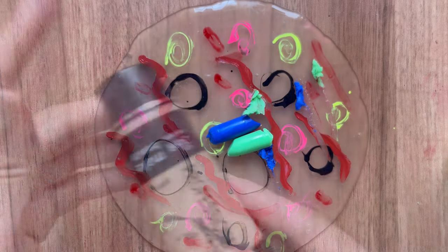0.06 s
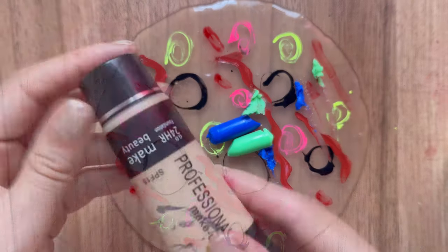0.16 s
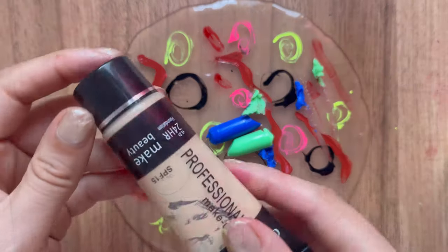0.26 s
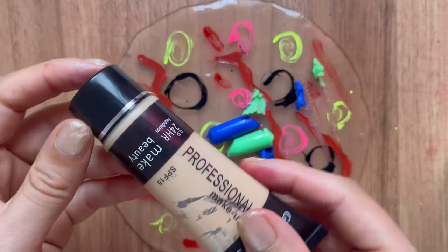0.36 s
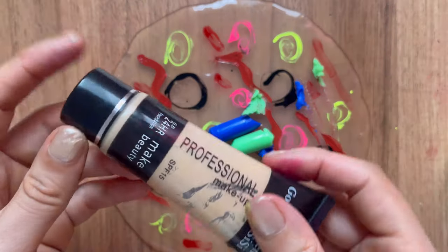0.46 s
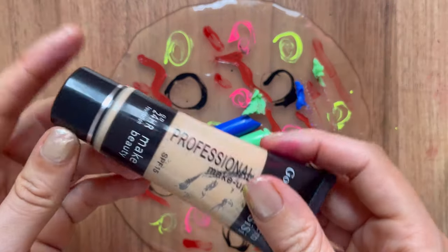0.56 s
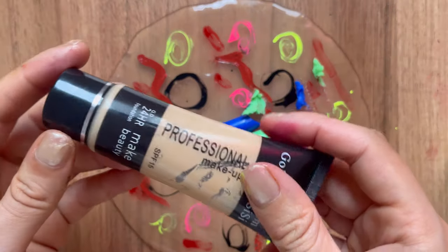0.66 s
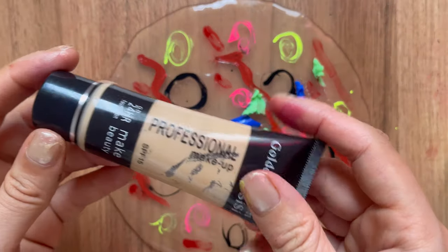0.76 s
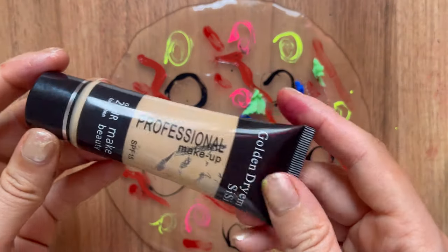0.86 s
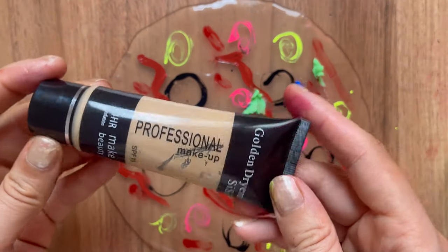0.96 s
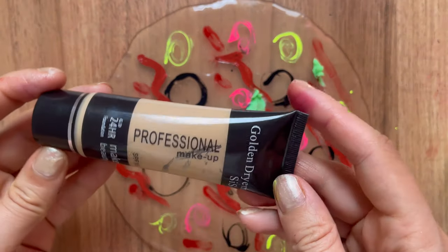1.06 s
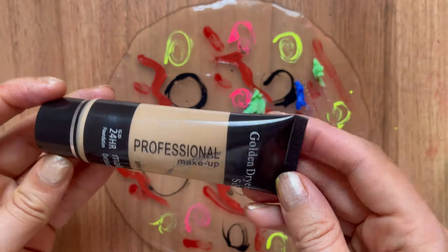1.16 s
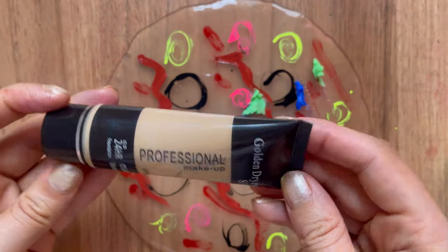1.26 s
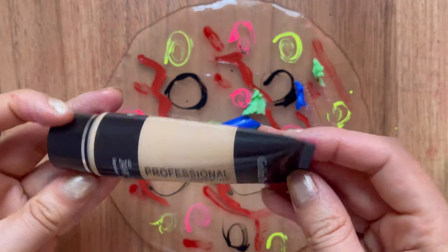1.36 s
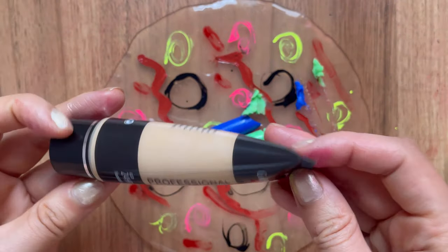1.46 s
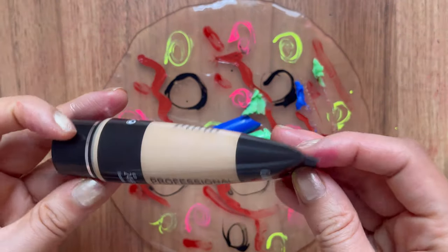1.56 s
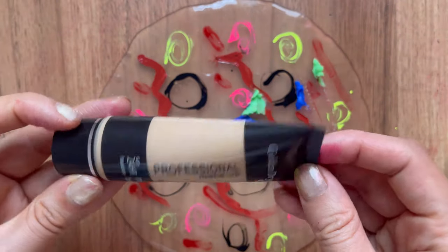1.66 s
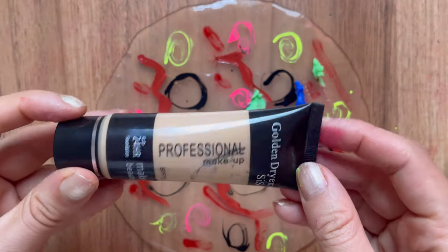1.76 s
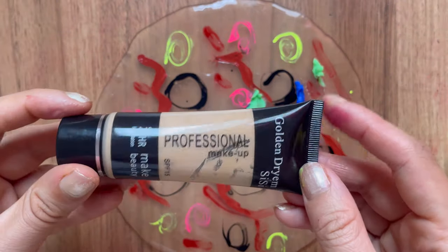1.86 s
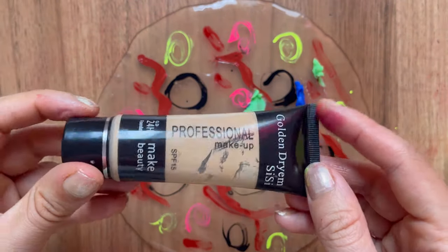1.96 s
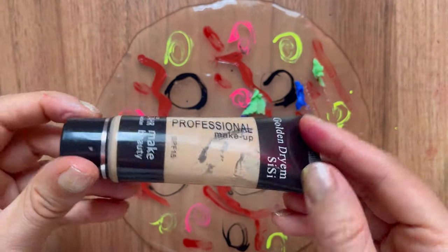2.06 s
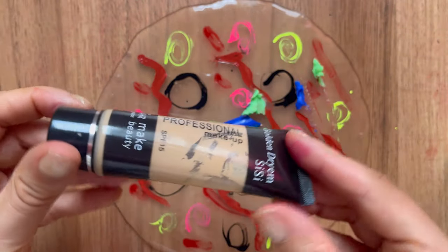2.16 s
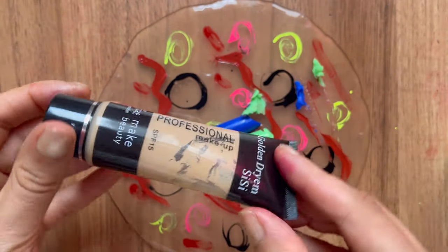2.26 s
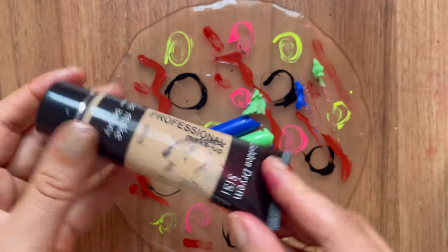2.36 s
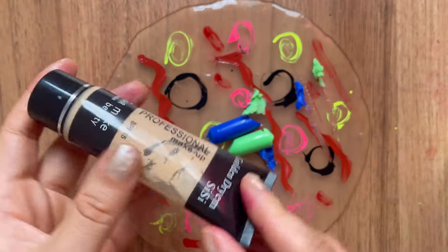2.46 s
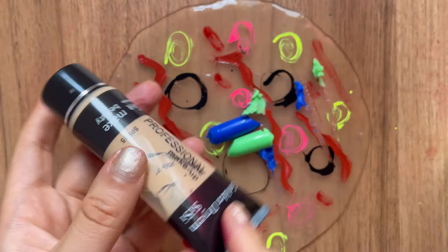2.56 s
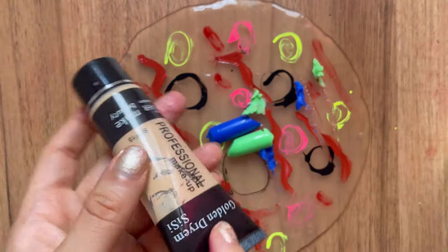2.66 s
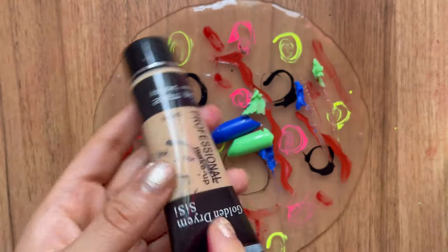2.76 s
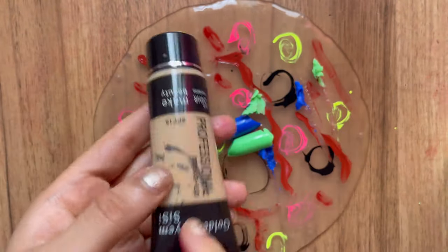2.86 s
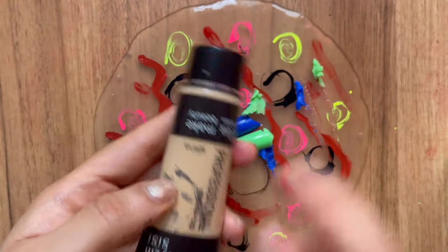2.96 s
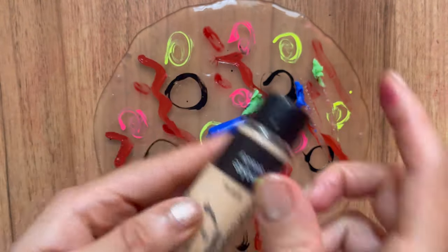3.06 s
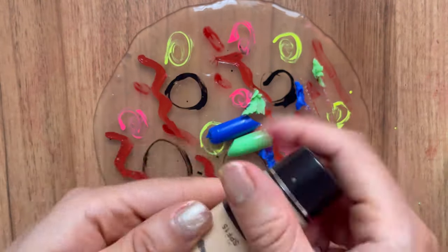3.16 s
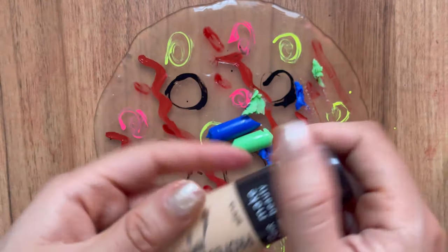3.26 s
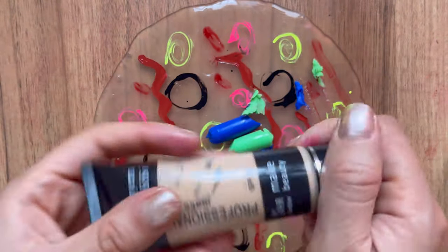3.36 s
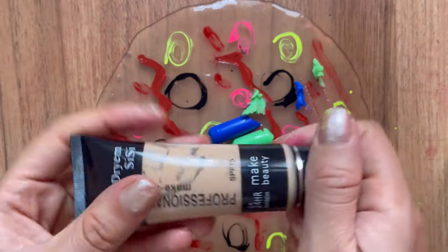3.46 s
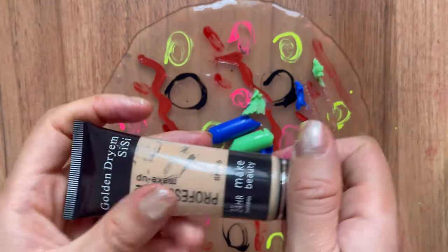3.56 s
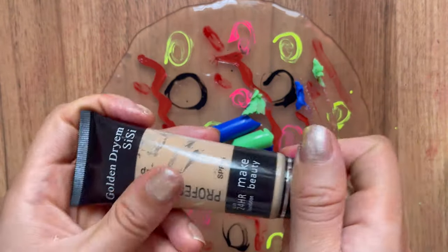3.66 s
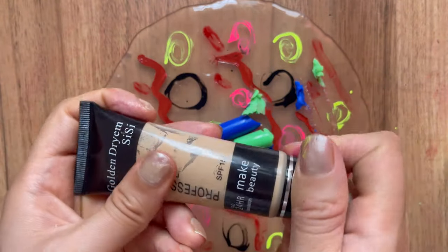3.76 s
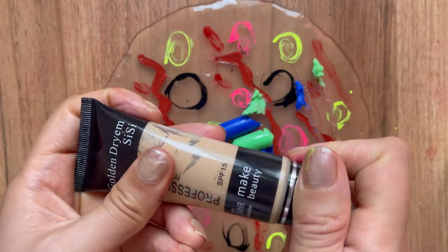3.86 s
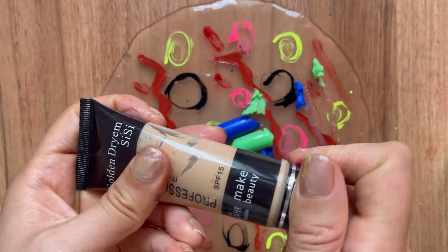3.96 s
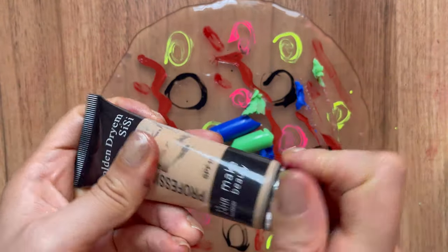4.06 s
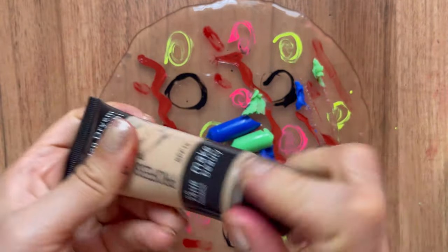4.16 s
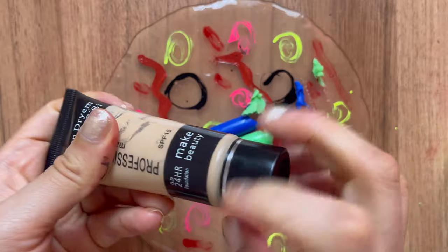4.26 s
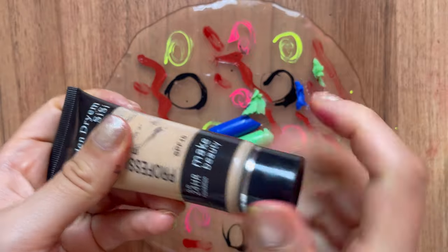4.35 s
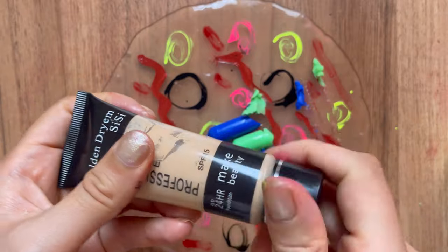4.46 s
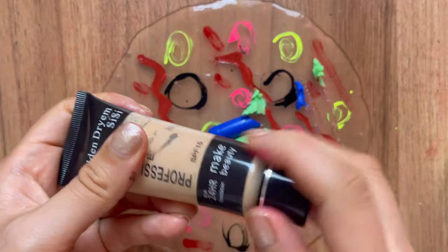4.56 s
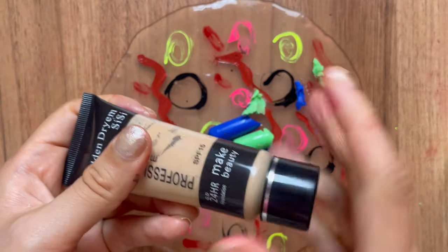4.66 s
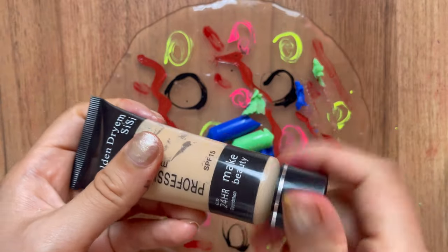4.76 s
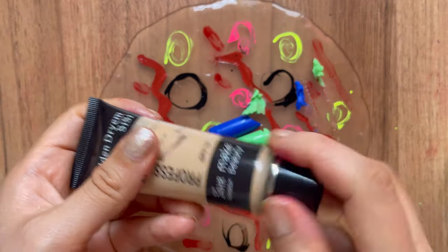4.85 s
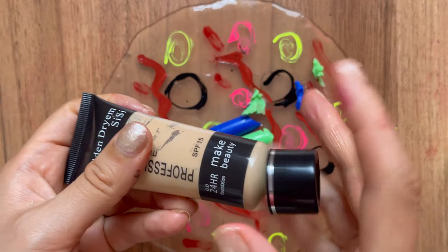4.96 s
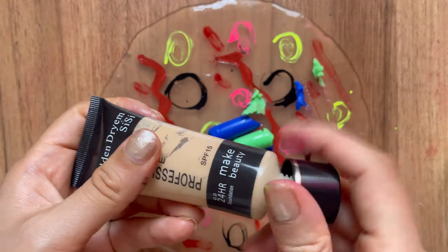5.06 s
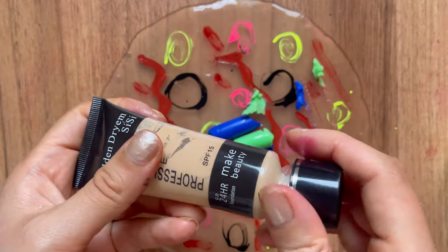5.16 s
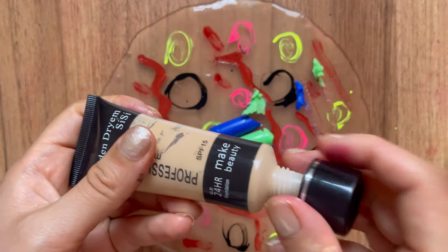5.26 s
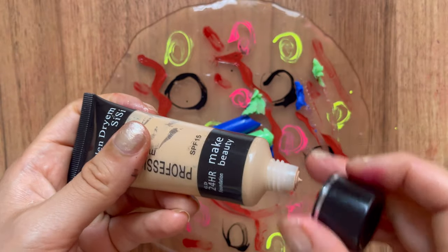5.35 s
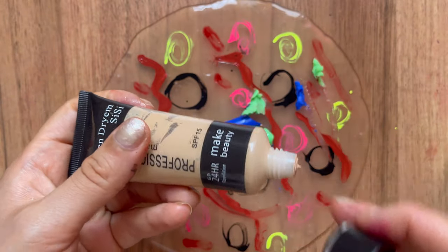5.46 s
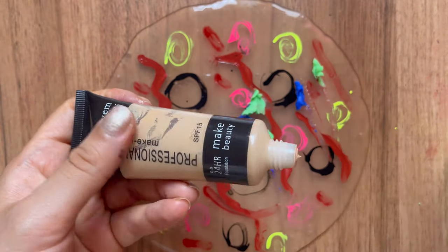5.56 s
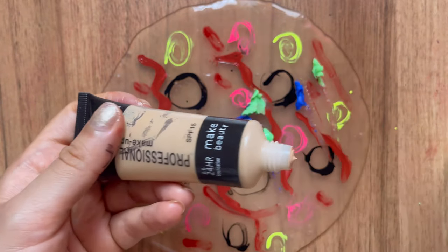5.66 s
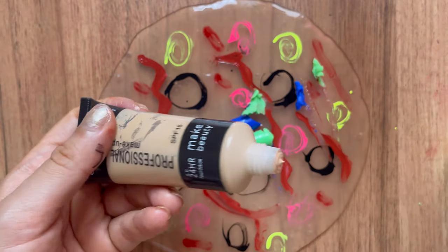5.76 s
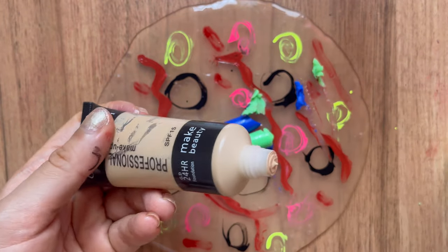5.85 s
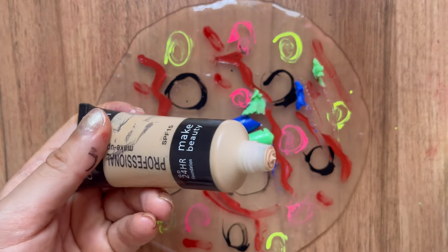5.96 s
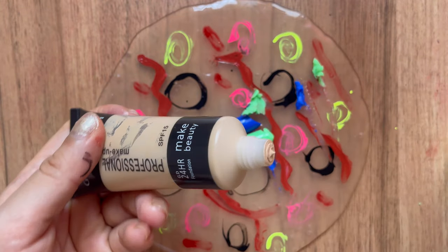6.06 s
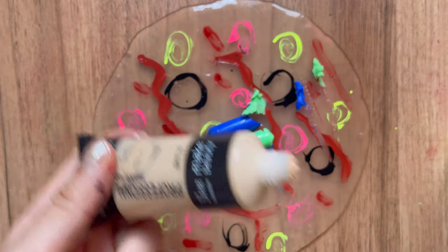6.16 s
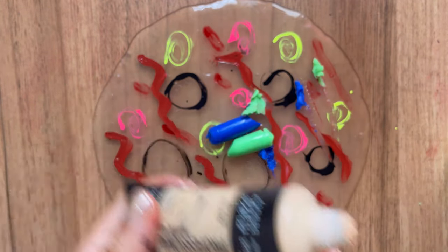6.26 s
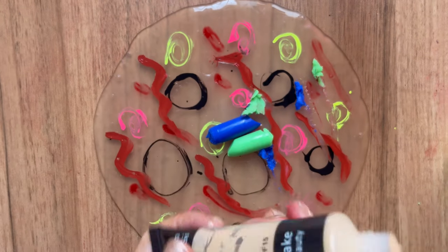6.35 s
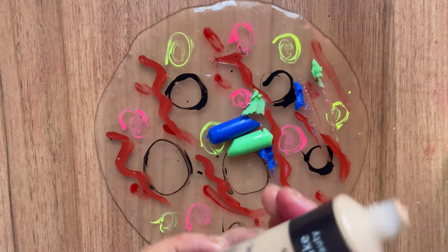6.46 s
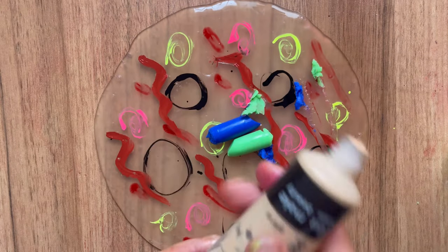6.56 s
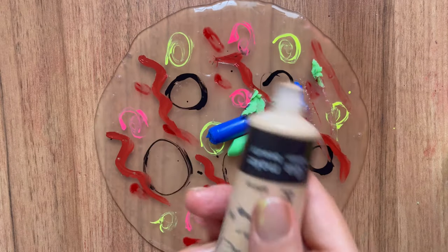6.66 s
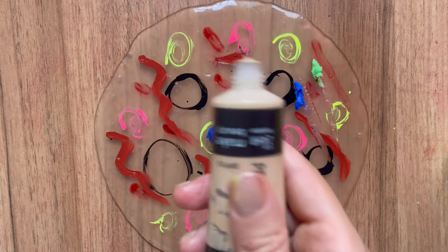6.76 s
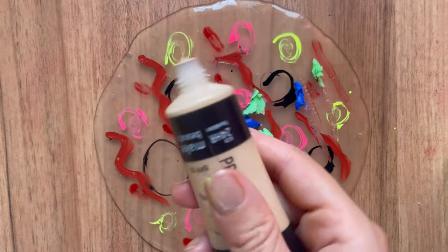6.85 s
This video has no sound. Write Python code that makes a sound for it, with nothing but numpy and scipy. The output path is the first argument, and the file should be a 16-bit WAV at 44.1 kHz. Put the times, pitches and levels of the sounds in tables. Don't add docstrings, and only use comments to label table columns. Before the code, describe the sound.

A quiet indoor room, heard through a close mono phone microphone, with soft hiss, a faint electrical hum and very low building rumble that swells around 3.8-5 s. From 0 to 3 s, fingers turn a plastic tube: faint dry skin rubs, light squeaky scuffs and tiny ticks, barely above the background. At about 3.05 s two crisp small clicks stand out, followed by softer rubbing. From 4.1 s the screw cap is worked loose, with faint thread scrapes and small hollow plastic knocks, denser from 4.4 to 4.85 s. A bright, sharp click comes at 4.88 s, then a few lighter clicks until 5.0 s. At 5.78 s the cap is put on the table: the loudest sound, a hard double clack with a very quick rattle, a short reflection and a soft settling tap near 5.87 s. Between 6.25 and 6.8 s, faint finger rubs and small ticks finish.

```python
import sys
import numpy as np
from scipy import signal
from scipy.fft import rfft, irfft
from scipy.io import wavfile
from scipy.ndimage import uniform_filter1d

SR = 44100
rng = np.random.default_rng(int(sys.argv[2]) if len(sys.argv) > 2 else 0)


def elevation(decibels):
    levels = np.asarray(decibels, float)
    return 10 ** (levels / 20)


def generate_wav(signal):
    frames = np.transpose(np.atleast_2d(signal))
    scaled = np.clip(frames, -1, 1) * 32767
    pcm = np.round(scaled).astype(np.int16)
    wavfile.write(sys.argv[1], SR, pcm)


N = 304731

# frequency in Hz, level in dB, decay t60 in s,
# group (rounded to even: 0 cavity, 1 tube body, 2 wall, 3 rim).
CAP_MODES = [(2190, -15.5, 0.0069, 1.5), (2876, -3.5, 0.015, 0.5), (3450, 0, .009, 1.5),
             (400, -5, 0.011, 1.5), (930, 1, 0.0062, 1), (1320, -5, 0.011, 2), (3920, 2.5, 0.0055, 2),
             (5140, -0.5, 0.007, 2), (6300, 0, 0.012, 2), (6820, 1.5, 0.0079, 2), (9660, -6, 0.0048, 3),
             (11400, 0.5, 0.0042, 3), (12900, -2.5, 0.0036, 3), (14300, -8, 0.0027, 3)]
CAP_CRACK_DB = 9


def evened(x):
    return x / np.sqrt(np.mean(x ** 2) + 1e-20)


def peaked(x):
    return x / (abs(x).max() + 1e-12)


def read(points, hz):
    f, value = np.transpose(points)
    return np.interp(np.log(hz + 1), np.log(f + 1), value)


def add(mix, s, sound):
    part = mix[round(s * SR):][:len(sound)]
    part += sound[:len(part)]


def band(x, low_hz, high_hz, order):
    return signal.sosfilt(signal.butter(order, [low_hz, high_hz], "band", fs=SR, output="sos"), x)


def resonate(x, hz, width_hz):
    turn = np.exp(2j * np.pi * hz * np.arange(len(x)) / SR)
    r = np.exp(-np.pi * width_hz / SR)
    return 2 * (turn * signal.lfilter([1 - r], [1, -r], x / turn)).real


def grit(per_s, spread_db):
    size = elevation(spread_db * np.minimum(rng.exponential(1, N), 4)) * rng.standard_normal(N)
    return size * (rng.random(N) < per_s / SR)


def contact(ms, chance):
    t = np.arange(len(chance)) / SR
    force = chance * np.exp(-1000 * t / np.clip(ms, .03, 12))
    force[0] = 1.5
    return force


def hush():
    # frequency in Hz, level in dB.
    spectrum = [(24, -30.5), (40, -1), (90, -9), (140, -22.5), (205, -13), (350, -24.5), (460, -24.5),
                (1630, -36), (4500, -39), (6000, -40), (9000, -43), (14800, -44), (15800, -48),
                (16300, -59.5)]
    # time in s, level in dB.
    stir = [(0, -2.5), (.45, -2), (.7, .5), (3, 0), (6.91, 0.05)]
    frames, hz = N // 512 + 5, np.fft.rfftfreq(2048, 1 / SR)
    a, b, patches = rng.standard_normal((frames, 1025, 3)).T
    patches = uniform_filter1d(patches, size=20, axis=0)
    patches = evened(uniform_filter1d(patches, size=8, axis=1))
    z = (a + 1j * b) * elevation(read(spectrum, hz)[:, None] + 1.2 * patches)
    noise = evened(signal.istft(z, nperseg=2048, noverlap=1536)[1][:N])
    s, stir_db = np.transpose(stir)
    return elevation(-61 + np.interp(np.arange(N) / SR, s, stir_db)) * noise


def whines():
    # frequency in Hz, width in Hz, level in dB.
    tones = [(99.8, 5.3, -72), (5080, 120, -86.5), (6530, 200, -92.5)]
    noise = rng.standard_normal((len(tones), N))
    return sum(elevation(db) * evened(resonate(x, hz, width)) for x, (hz, width, db) in zip(noise, tones))


def rumble():
    # frequency in Hz, width in Hz, mean level in dB, random swell in dB.
    drones = [(7.6, 3.95, -57, 5.5), (20., 2.44, -63.5, 6.5), (36.2, 2.5, -69.5, 3.5)]
    # start in s, length in s, level in dB.
    surges = [
        (0.058, 0.13, -67),
        (0.798, 0.56, -60),
        (2.075, .2, -64.5),
        (3.803, 0.37, -48.5),
        (4.218, 0.7, -53),
        (4.85, 0.29, -53.5),
        (5.85, 0.63, -62.5),
        (6.45, .15, -57),
        (6.63, 0.23, -59.5),
    ]
    wander = evened(uniform_filter1d(rng.standard_normal((len(drones), N)), size=9000, axis=1))
    swell = rng.standard_normal((len(drones), N))
    span = round(0.14 * SR)
    swell = evened(uniform_filter1d(uniform_filter1d(swell, span, axis=1), span, axis=1))
    levels = np.array([elevation(db + swell_db * s) for s, (_, _, db, swell_db) in zip(swell, drones)])
    for s, length, db in surges:
        add(levels[-1], s, elevation(db) * signal.windows.tukey(round(length * SR), .6))
    out = np.zeros(N)
    for w, level, (hz, width, _, _) in zip(wander, levels, drones):
        phase = 2 * np.pi * np.cumsum(hz + .4 * width * w) / SR
        out += np.sqrt(2) * level * np.sin(phase)
    return out


def room(x, colour):
    # frequency in Hz, reverberation time in s.
    decay = [(300, .45), (1000, .45), (2500, 0.42), (5000, 0.37), (10000, 0.13)]
    taps = np.zeros(SR // 2)
    at = np.arange(150, SR // 2 - 20, 20)
    taps[at + rng.integers(0, 20, len(at))] = rng.choice([-1., 1.], len(at))
    hz, t, z = signal.stft(taps, SR, nperseg=256)
    tail = signal.istft(z * elevation(-60 * t / read(decay, hz)[:, None]), SR, nperseg=256)[1]
    tail /= np.linalg.norm(tail)
    tail_hz = np.fft.rfftfreq(len(tail), 1 / SR)
    tail = irfft(rfft(tail) * elevation(read(colour, tail_hz)), len(tail))
    return signal.oaconvolve(x, tail)[:N]


def strokes():
    # start in s, length in s, squeak in dB, scuff and grip in dB relative to it.
    firm = [(0.785, 0.047, -72, -3, -4), (1.34, 0.1, -76, -3, -8), (1.772, 0.06, -75, 4, -2),
            (1.93, 0.089, -73.5, 1.5, 1), (2.258, 0.12, -72.5, -8, -3), (2.593, 0.14, -72.5, -5, -4),
            (2.758, 0.042, -74, 3, -2), (2.791, 0.026, -60, 1, 1.5), (2.966, 0.14, -73, -9, -4),
            (3.127, 0.13, -65.5, -12, -4), (3.205, 0.13, -68, -8, -7), (3.408, 0.12, -74.5, -7, 4),
            (3.923, 0.1, -66.5, -13, 3), (4.003, 0.1, -67, -10, 1), (4.053, 0.1, -63, -9, -13),
            (4.368, 0.022, -73.5, -2, 3), (4.443, 0.089, -67, -2.5, -8), (4.784, 0.047, -67, -7, -4),
            (5, 0.046, -72, 1, 0), (6.26, 0.036, -73, -11, -2), (6.333, 0.096, -66.5, -3, -5.5),
            (6.443, 0.14, -73.5, -3, -3)]
    # start in s, length in s, squeak in dB, finger pressure in dB.
    grazes = [(0, 0.066, -79, -6), (0.3, 0.065, -82, -4), (0.618, 0.15, -81, 4), (0.856, 0.1, -81, -6),
              (1.074, 0.019, -77, 2), (1.55, 0.24, -81.5, -4), (1.897, 0.036, -80, 0),
              (2.13, 0.079, -79, 1), (2.365, 0.054, -75, -7), (2.446, 0.11, -79, -2), (3.56, 0.051, -81, 1),
              (3.65, 0.04, -76, 2), (3.859, 0.062, -77.5, 1), (5.468, 0.08, -77.5, -15),
              (6.297, 0.048, -77, -2), (6.733, 0.091, -75.5, -2)]
    rows = [(*row, -2.5) for row in firm]
    for s, length, db, press in grazes:
        rows.append((s, length, db, press - 4, press, -5))
    return rows


def rub():
    # low edge in Hz, high edge in Hz, tube resonance in Hz.
    bands = [(4900, 8800, 7400), (1000, 2800, 2300), (2800, 4900, 4200), (8800, 15000, 12000)]
    levels, out = np.zeros((len(bands), N)), np.zeros(N)
    for s, length, level_db, *rel_db in strokes():
        swell = signal.windows.tukey(round(1.16 * max(length, .01) * SR), .8)
        for level, db in zip(levels, [0] + rel_db):
            add(level, s, elevation(level_db + db) * swell)
    grip = evened(uniform_filter1d(rng.standard_normal((len(bands) + 1, N)), size=400, axis=1))
    shared = grip[-1]
    for level, own, (low_hz, high_hz, wall_hz) in zip(levels, grip, bands):
        slips = elevation(1.6 * own + 0.68 * shared) * grit(per_s=16000, spread_db=2.5)
        wall = .8 * resonate(slips, wall_hz, .13 * wall_hz)
        out += level * evened(band(slips + wall, low_hz, high_hz, order=3))
    return out


def ticks():
    # time in s, peak in dB, centre in Hz, length in ms,
    # thud in dB relative to the peak.
    taps = [(1.081, -60, 6000, 4.3, -13), (3.0367, -39, 4700, 1.2, -5.5), (3.0762, -46.5, 5530, 3.8, -9),
            (3.256, -54, 2350, 2.5, -20), (3.975, -56, 10500, 1.5, -30), (5.476, -56.5, 6900, 8, -14),
            (6.263, -50, 4520, 2.5, -22), (6.323, -62, 3500, 2.5, -9), (6.366, -57, 6000, 3.9, -17),
            (6.39, -50, 2470, 3.5, -9.5), (6.41, -61, 2500, 3.5, -17), (6.525, -54, 4000, 3.8, -13)]
    # time in s, peak in dB, frequency in Hz.
    pings = [(.805, -59, 10800), (1.807, -57, 2700), (1.903, -60.5, 2400), (2.793, -51, 3020),
             (3.235, -58.5, 2400), (4.12, -63, 2300), (4.14, -59, 2600), (4.152, -54, 2750),
             (4.174, -60, 2880), (4.202, -61, 2850), (4.212, -64, 2830), (5.505, -63, 10800)]
    rows = [(*row, min(0.18 * row[3], 1.2)) for row in taps]
    rows += [(*row, 8, -21, 0.076) for row in pings]
    out = np.zeros(N)
    for (s, peak_db, hz, ms, thud_db, spread), chance in zip(rows, rng.standard_normal((len(rows), 1500))):
        force, width_hz = contact(ms, chance), np.clip(spread, .1, 3) * hz
        snap = band(resonate(force, hz, width_hz), 0.075 * hz, min(1.7 * hz, 16000), order=1)
        thud = resonate(force, hz=560, width_hz=320)
        add(out, s, elevation(peak_db) * (peaked(snap) + elevation(thud_db) * peaked(thud)))
    return out


def rings(modes, detune, crack_db, freedom):
    # low edge in Hz, high edge in Hz.
    group_hz = [(1800, 4200), (380, 2100), (3800, 8800), (7000, 16000)]
    t, groups = np.arange(2600) / SR, np.zeros((4, 2600))
    for k, ((hz, db, t60, group), shift) in enumerate(zip(modes, detune)):
        decay = elevation(db - 60 * t / t60 / freedom)
        groups[round(float(group))] -= (-1) ** k * decay * np.sin(2 * np.pi * hz * shift * t)
    groups *= 1 - np.exp(-t / .0001)
    groups[:, 1] += elevation(crack_db) * np.array([1, -1, -1, 1])
    return [band(g, *edges, order=2) for g, edges in zip(groups, group_hz)]


def knocks(rows, modes, wobble, crack_db):
    out = np.zeros(N)
    for (s, peak_db, *rel_db, ms), chance in zip(rows, rng.standard_normal((len(rows), 900))):
        freedom = np.interp(peak_db, [-42, -22], [.6, 1])
        groups = rings(modes, 1 + wobble * chance[-len(modes):], crack_db, freedom)
        force = contact(ms, chance)
        parts = [elevation(db) * peaked(np.convolve(force, g)) for db, g in zip([0] + rel_db, groups)]
        add(out, s, elevation(peak_db) * sum(parts))
    return out


def drag():
    # start in s, length in s, peak in dB.
    scrapes = [
        (4.1, 0.13, -79),
        (4.36, 0.23, -67.5),
        (4.72, 0.16, -63),
        (4.87, 0.27, -74),
        (5.47, .09, -76),
    ]
    cavity, body, wall, rim = rings(CAP_MODES, np.ones(len(CAP_MODES)), CAP_CRACK_DB, freedom=1)
    colour = cavity + elevation(-8) * body + elevation(-3) * wall + elevation(-5) * rim
    scrape = evened(signal.oaconvolve(grit(per_s=2500, spread_db=3.5), colour)[:N])
    t, level = np.arange(N) / SR, np.zeros(N)
    for start, length, peak_db in scrapes:
        s = start + length * np.array([0, .55, 1])
        db = peak_db + np.array([-12, 0, -10])
        gate = np.interp(t, [s[0], s[0] + .015, s[-1] - .03, s[-1]], [0, 1, 1, 0])
        level += elevation(np.interp(t, s, db)) * gate
    return level * scrape


def landings():
    # frequency in Hz, level in dB, decay t60 in s, group as in CAP_MODES.
    table_modes = [(2050, -11, .01, 0), (2425, 0, .011, 0), (2620, -22, .07, 0), (3000, -16, .01, 0),
                   (3590, -14, .01, 0), (158, -6, .03, 1), (850, -7, .012, 1), (1150, -7, .008, 1),
                   (1480, 0, .012, 1), (4150, -2, .008, 2), (4570, 0, .008, 2), (5070, -1, .008, 2),
                   (6060, -3, .011, 2), (6800, -12, .008, 2), (7500, 3, .006, 3), (11700, 0, .004, 3)]
    # time in s, peak in dB, table in dB relative to it, contact in ms.
    touches = [
        (5.7799, -16, -9, .03),
        (5.784, -16, -9, .03),
        (5.7852, -22, -20, .03),
        (5.7861, -22, -8, .03),
        (5.7873, -27, -20, .03),
        (5.8584, -47, 4, 2.5),
        (5.8681, -34, 7, .5),
    ]
    rows = [(s, db, table_db, -10, -28, ms) for s, db, table_db, ms in touches]
    x = knocks(rows, table_modes, wobble=.003, crack_db=-8)
    dip = .6 * resonate(x, hz=430, width_hz=350)
    lift = resonate(x, hz=1060, width_hz=180)
    return x - dip + lift


def cap_knocks():
    # time in s, cavity peak in dB, push into the tube body in dB, share on the rim in dB.
    hits = [(4.0697, -54.5, -6, -3), (4.085, -51.5, -4.5, -5), (4.3781, -52, -3, -2), (4.445, -49, -6, -11),
            (4.4912, -43.5, -4.5, -13), (4.5504, -42, -3, -23), (4.5585, -47, -3, -19),
            (4.7127, -42.5, 8, 0), (4.7142, -43.5, 11, -5), (4.7207, -40.5, 7.5, -4),
            (4.7463, -44.5, -6, -25), (4.767, -56, -1, -15), (4.779, -48.5, -0.5, -16),
            (4.8293, -57.5, 7.5, -12), (4.8434, -52.5, 8, -2), (4.8537, -42.5, 0, -13),
            (4.8768, -19, -17.5, -12.5), (4.9281, -38, 1.5, -25), (4.9371, -49, 7, -18),
            (4.9484, -46, 4, -18), (4.9815, -32, -10.5, -22), (4.9871, -28, -8.5, -17),
            (4.9915, -39, -1.5, -11)]
    rows = []
    for s, db, body_db, rim_db in hits:
        wall_db = -2 + 0.51 * body_db
        ms = 0.53 * np.exp((-18.5 - db) / 19.5)
        rows.append((s, db, body_db, wall_db, rim_db, ms))
    return knocks(rows, CAP_MODES, wobble=0.017, crack_db=CAP_CRACK_DB)


def scene():
    # frequency in Hz, level in dB.
    sideways = [(2300, 2), (2750, -7), (3080, 7.5), (3400, 0.5), (6400, 1.5), (9000, -2)]
    # frequency in Hz, level in dB.
    table_sideways = [(800, 0.5), (1100, 4.5), (1450, -4), (1900, 5), (2380, -8.5), (2590, 7.5),
                      (3000, 3.5), (5000, -0.5)]
    background = hush() + whines() + rumble()
    hands = rub() + ticks() + drag() + cap_knocks()
    table = landings()
    echoes = elevation(-20.5) * room(hands, sideways) + elevation(-17) * room(table, table_sideways)
    return (background + hands + table + echoes)[None]


def roll_off(x):
    return signal.sosfilt(signal.butter(12, 16530, fs=SR, output="sos"), x)


def record(dry):
    return roll_off(dry)


dry = scene()
out = record(dry)
generate_wav(out)
```